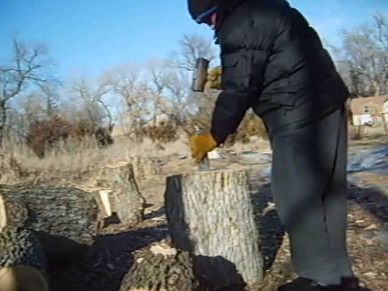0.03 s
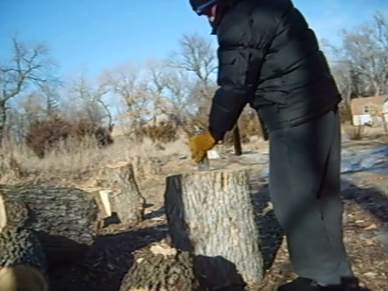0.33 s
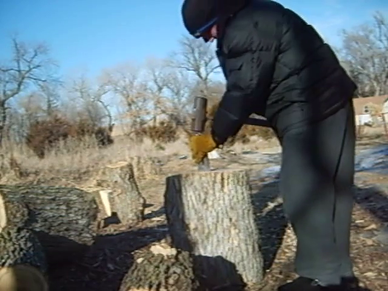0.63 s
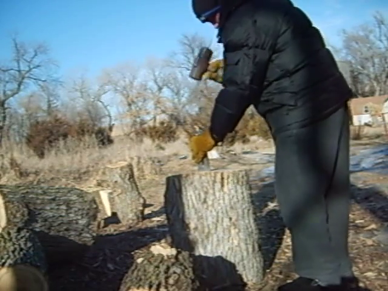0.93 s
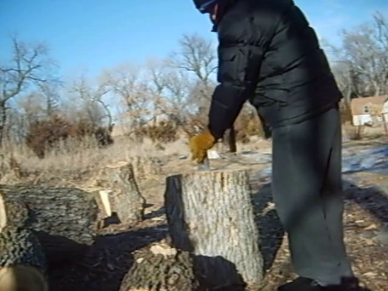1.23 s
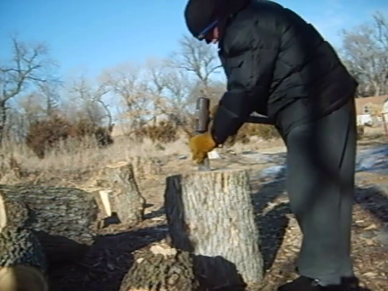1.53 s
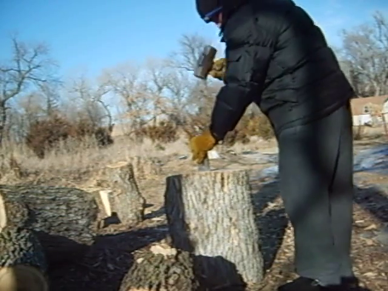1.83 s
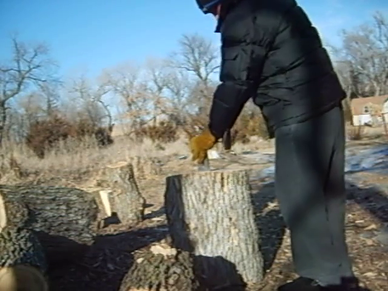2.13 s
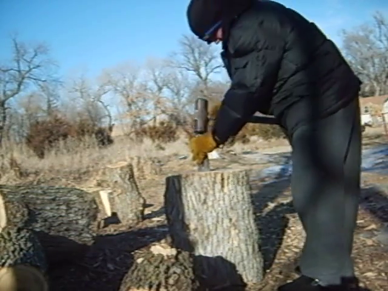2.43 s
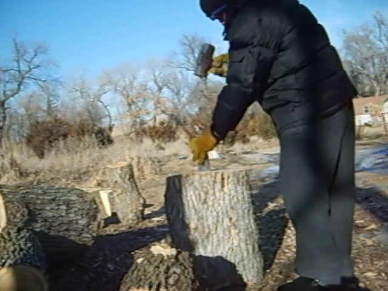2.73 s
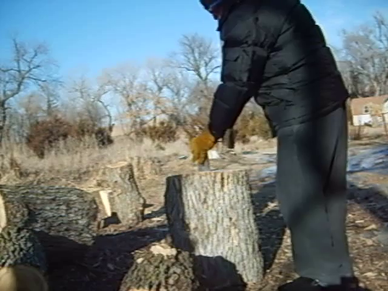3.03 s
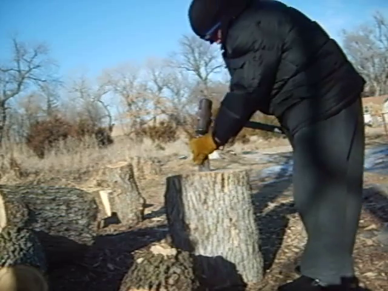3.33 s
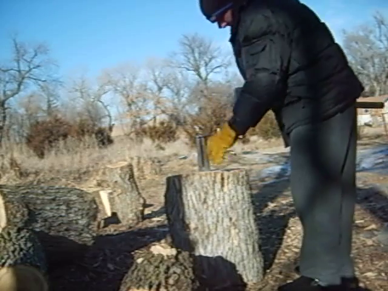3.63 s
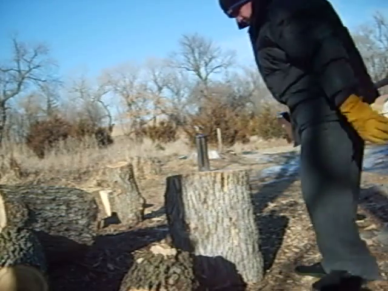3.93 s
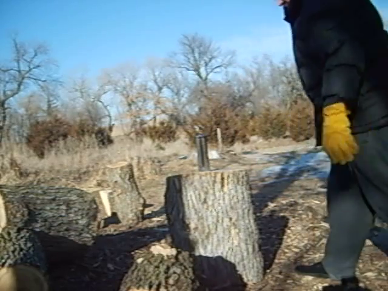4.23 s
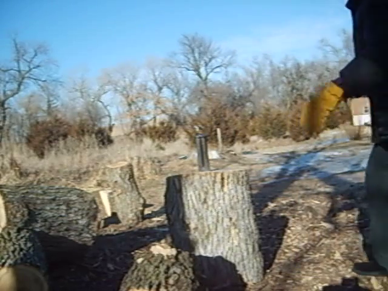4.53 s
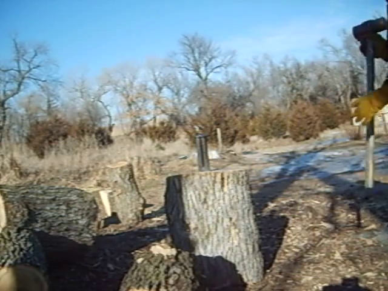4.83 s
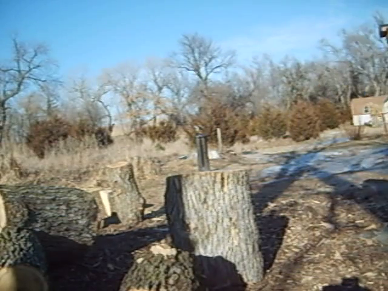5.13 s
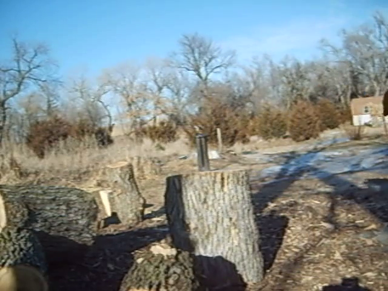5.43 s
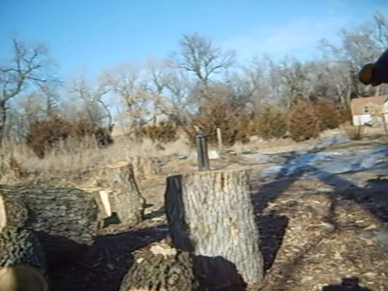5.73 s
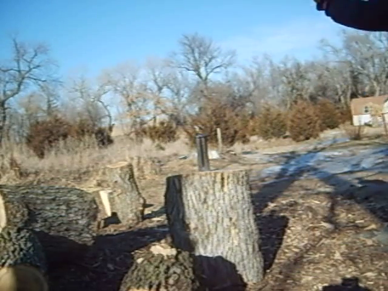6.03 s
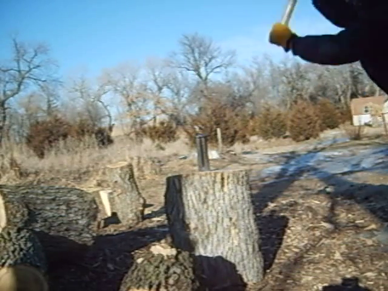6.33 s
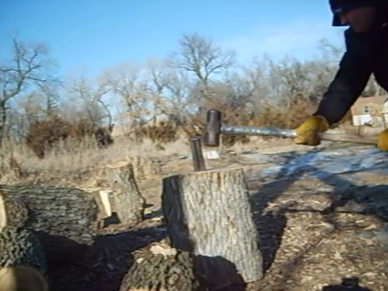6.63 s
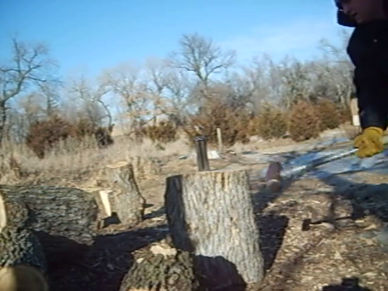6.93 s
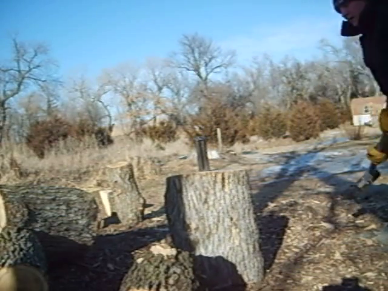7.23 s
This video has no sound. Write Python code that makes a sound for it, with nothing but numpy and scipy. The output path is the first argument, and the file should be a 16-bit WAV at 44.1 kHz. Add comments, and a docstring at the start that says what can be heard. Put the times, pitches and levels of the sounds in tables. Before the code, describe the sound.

Over a very faint outdoor wind rumble, the tail of an earlier clang dies away. A hand hammer then strikes a steel wedge in a log four times, at about 0.6, 1.5, 2.4 and 3.3 seconds. Each blow is a loud, sharp crack with a short metallic clang, a thud of wood and a thin high ring. The hits overload the small microphone, scatter off a nearby woodpile and fade among distant trees. A nylon jacket swishes faintly into every swing. From about 3.9 to 5.6 seconds, quiet footsteps crunch and scuff over dry wood chips, with small twig snaps and jacket rustles. At about 6.6 seconds one heavier sledgehammer blow lands, with a fuller, hollow wooden knock and a bright ring. A soft step follows at 6.8 seconds, and the jacket rustles lightly until the end at around 7.5 seconds.

```python
"""Over a faint rumble of wind, the clang of an earlier blow dies away. A hand hammer sets a steel wedge
in a log with four steady blows, a nylon jacket swishing into every swing. Each clang overloads the
small microphone, scatters off the woodpile and fades among far trees. The worker steps back over
crunching wood chips and snapping twigs, then lands one sledge blow, and the jacket rustles once more."""
import sys
import numpy as np
from scipy import signal
from scipy.fft import rfft, irfft, next_fast_len
from scipy.io import wavfile

SR = 44100
rng = np.random.default_rng(int(sys.argv[2]) if len(sys.argv) > 2 else 0)


def store_wav(level_fs):
    """Save 16-bit WAV to argv[1]."""
    pcm = np.round(np.clip(np.atleast_2d(level_fs), -1, 1) * 32767)
    wavfile.write(sys.argv[1], SR, pcm.T.astype(np.int16))


N = 329427
MIC_EDGE_HZ, OUTPUT_EDGE_HZ = 11200, 17400


def amp(db):
    """Decibels to gain."""
    return 10 ** (np.asarray(db) / 20)


def unit(x):
    """Scales x to rms 1."""
    return x / np.sqrt(np.mean(x ** 2) + 1e-20)


def seconds(length):
    """A time axis of the given length."""
    return np.arange(int(length * SR)) / SR


def decay(t, t60):
    """Falls 60 dB in t60 seconds."""
    return np.exp(-np.log(1000) * t / t60)


def add(mix, start_s, sound):
    """Mixes a sound in at start_s, trimming what falls outside the mix."""
    start = round(start_s * SR)
    sound = sound[max(-start, 0):]
    part = mix[max(start, 0):][:len(sound)]
    part += sound[:len(part)]


def colour(x, spectrum):
    """Shapes x with an EQ curve of (freq_hz, level_db) points, at rms 1."""
    hz, db = np.transpose(spectrum)
    size = next_fast_len(len(x))
    freqs = np.fft.rfftfreq(size, 1 / SR)
    gain = amp(np.interp(np.log(freqs + 1), np.log(hz + 1), db))
    return unit(irfft(rfft(x, size) * gain, size)[:len(x)])


def noise(spectrum, size):
    """Noise through an EQ curve, at rms 1."""
    return colour(rng.standard_normal(size), spectrum)


def drift(per_s, size):
    """Random wander of rms 1, heading for a new value per_s times a second."""
    knots = rng.standard_normal(1024)
    return unit(np.interp(np.arange(size) * per_s / SR, np.arange(1024), knots))


def swells(events):
    """A gain envelope of soft bells, one for each (peak_s, length_s, level_db)."""
    t = np.arange(N) / SR
    return np.sqrt(sum(amp(2 * db) * np.exp(-(2 * (t - s) / length) ** 2) for s, length, db in events))


def lowpass(x, hz):
    """A steep treble cut with no delay."""
    return signal.oaconvolve(x, signal.firwin(161, hz, window=("kaiser", 7), fs=SR), "same")


# EQ of the open-air bed: freq_hz, level_db
AIR_EQ = [(15, -40.5), (25, -6), (59, 0), (96, 1.5), (165, -5.5), (260, -16), (603, -12), (703, -17),
          (884, -13), (979, -18.5), (1590, -18), (3410, -26), (6610, -21.5), (10200, -33.5), (11000, -37),
          (14300, -71), (22000, -120)]
# EQ of the low rumble of wind and ground: freq_hz, level_db
RUMBLE_EQ = [(20, -19), (45, -10.5), (78, -0.5), (130, -3.5), (200, -11), (320, -24.5), (800, -49)]
# Puffs of wind on the microphone: peak_s, length_s, level_db
WIND_PUFFS = [(0.12, 0.09, -60.5), (1.12, 0.13, -59), (1.28, 0.034, -58), (1.87, .2, -58.5)]
def outdoors(air_db=-61, breeze_db=-67.5, lumps_db=1.0):
    """A bed of winter air, with a light, lumpy breeze that puffs at the microphone."""
    wind = noise(RUMBLE_EQ, N) * (amp(breeze_db) + swells(WIND_PUFFS))
    wind *= amp(lumps_db * drift(6.4, N))
    return wind + amp(air_db) * noise(AIR_EQ, N)


# EQ of the hammer's attack: freq_hz, level_db
CRACK_EQ = [(40, -14.5), (300, -8), (900, -4.5), (1700, -3), (2400, -2), (3500, -9.5), (4200, -4),
            (4550, -5.5), (5000, 3.5), (5350, -2), (5720, 2.5), (6500, -3.5), (8500, -10), (11000, -16.5)]
def crack(t, stretch):
    """Steel faces meet: a broadband burst of a few milliseconds with a quiet tail."""
    envelope = np.exp(-(t / (.0026 * stretch)) ** 2) + amp(-17) * decay(t, 0.026 * stretch)
    head = envelope[:2048]
    burst = rng.standard_normal(len(head)) * head
    for _ in range(3):  # iron out chance peaks and notches while keeping the burst tight
        flat = irfft(np.exp(1j * np.angle(rfft(burst))))
        burst = colour(flat, CRACK_EQ) * np.sqrt(head)
    burst = burst * np.linalg.norm(head) / np.linalg.norm(burst)
    return np.pad(burst, (0, len(t) - len(head)))


# Modes of the wedge seated in the wood: pitch_hz, level_db, t60_s
WEDGE_MODES = [(761, -12.5, 0.11), (895, -9.5, .17), (1248, -1.5, 0.061), (1565.6, 4.5, 0.042),
               (1795, -3, 0.069), (2036, -9, 0.15), (2332, -4, 0.066), (2895, -11.5, 0.12),
               (4070, -15.5, 0.19), (4370, -12, 0.057), (4930, -4, 0.039), (5950, -6, 0.049),
               (5770, -16, .16), (7350, -15, 0.12)]
def wedge(t, spread_db=1.5, detune=0.0033):
    """The wedge clangs in its modes; each blow lands a little differently."""
    out = np.zeros(len(t))
    scatter = rng.standard_normal((len(WEDGE_MODES), 3))
    for (hz, db, t60), (strength, shift, phase) in zip(WEDGE_MODES, scatter):
        tone = np.sin(2 * np.pi * (hz * (1 + detune * shift) * t + phase))
        out += amp(db + spread_db * strength) * decay(t, t60) * tone
    return out


def push(t, width_s=0.0017):
    """The blow shoves the top of the log: one short, low pressure pulse."""
    u = t / width_s
    return u * (2 - u) * np.exp(-u)


# Modes of the log under the wedge: pitch_hz, level_db, t60_s
LOG_MODES = [(55, -11, 0.0052), (86, -23.5, 0.013), (127, -24, 0.17), (192, -21, 0.083),
             (284, -15.5, 0.044), (441, -17.5, 0.023)]
def thud(t):
    """The log takes the push and knocks against the ground."""
    return sum(amp(db) * decay(t, t60) * np.sin(2 * np.pi * hz * t) for hz, db, t60 in LOG_MODES)


def shudder(t, t60=0.21, attack_s=0.0054):
    """The ground under the log rumbles briefly."""
    return amp(-38) * noise(RUMBLE_EQ, len(t)) * decay(t, t60) * (1 - np.exp(-t / attack_s))


def thunk(t, hz=660, t60=.08):
    """The wood gives a hollow note as the wedge sinks in."""
    return decay(t, t60) * np.sin(2 * np.pi * hz * t)


def steel_ring(t, hz, pressed_hz=8715, ease_hz_per_s=1800, lift_s=0.033, sag_hz=20, sag_s=.16):
    """A high steel note: sharp under the hammer, then free, sinking and beating, with a late echo."""
    pressed = np.sin(2 * np.pi * np.cumsum(pressed_hz - ease_hz_per_s * t) / SR)
    pressed *= decay(t, 0.41) / (1 + (t / lift_s) ** 6)
    cycles = np.cumsum(hz - sag_hz * (1 - np.exp(-t / sag_s))) / SR
    beat_hz = 8.5 * rng.uniform(.5, 1.4)
    pair = np.sin(2 * np.pi * cycles) + .5 * np.sin(2 * np.pi * (cycles - beat_hz * t + rng.random()))
    free = (1 - np.exp(-t / 0.032)) * decay(t, .25)
    echo = np.exp(-((t - 0.16) / 0.19) ** 2)
    return amp(-21.5) * pressed + pair * (amp(-21.5) * free + amp(-59) * echo)


# EQ of the scatter off the woodpile: freq_hz, level_db
WOODPILE_EQ = [(40, -11), (130, -6.5), (300, -4), (560, -10), (850, -0.5), (1700, -3), (2700, -2),
               (3450, -7), (4200, -4.5), (5600, -4), (7400, -7.5), (8200, -14), (9500, -20), (11000, -30.5)]
# EQ of the slap off broad surfaces: freq_hz, level_db
SLAP_EQ = [(400, -41.5), (1100, -4), (1700, 10), (2300, -2.5), (3500, -6), (9000, -48)]
def woodpile(t, spread_s=0.022, falloff=1.316):
    """Logs nearby throw the blow back in two waves that thin out with distance."""
    first = np.clip((t - .0105) / .0015, 0, 1)
    second = np.clip((t - .0205) / .002, 0, 1)
    paths = (.7 * first + 0.48 * second) * (1 + (t / spread_s) ** 2) ** -falloff
    paths *= amp(2.7 * drift(300, len(t)))
    t_ring = t[:SR // 8]
    clang = wedge(t_ring) * decay(t_ring, 0.26)  # the echoes carry the wedge's modes
    reflections = rng.standard_normal(len(t)) * paths
    ringing = signal.fftconvolve(reflections, clang / np.linalg.norm(clang))[:len(t)]
    scatter = noise(WOODPILE_EQ, len(t)) * paths
    slap = noise(SLAP_EQ, len(t)) * first * np.exp(-((t - .013) / .004) ** 2)
    return amp(-9.5) * scatter + amp(-16) * ringing + amp(-11.5) * slap


# Bands that linger among the far trees: centre_hz, width_hz, level_db
TREE_BANDS = [(1664, 440, -0.5), (2250, 460, -7), (2920, 620, -5), (4070, 340, 2.5), (5000, 300, -8),
              (6100, 500, -8), (7450, 200, -14.5)]
def trees(t, pitch_ratio, t60_low=2.4, t60_high=0.99):
    """Far trunks scatter the clang into a long, fuzzy tail whose high bands die first."""
    out = np.zeros(len(t))
    for hz, width_hz, db in TREE_BANDS:
        pole = np.exp(-np.pi * width_hz / SR)
        white = rng.standard_normal(len(t)) + 1j * rng.standard_normal(len(t))
        wander = signal.lfilter([1], [1, -2 * pole, pole * pole], white)
        band = unit((wander * np.exp(2j * np.pi * hz * pitch_ratio * t)).real)
        out += amp(db) * band * decay(t, np.interp(hz, [1600, 4200], [t60_low, t60_high]))
    return amp(-55) * out * (1 - np.exp(-t / .015)) * amp(1.2 * drift(28, len(t)))


def wall(t, delay_s=0.1387, smear_s=0.0082):
    """A far wall answers the clang with one dull slap."""
    dull = noise([(400, -38), (1100, 4), (1700, 6), (2300, 2), (3500, -9), (9000, -53)], len(t))
    return amp(-32) * dull * np.exp(-((t - delay_s) / smear_s) ** 2)


# The mix of each blow; the first is only a tail, the last is the sledge:
# start_s, crack_db, crack_stretch, clang_db, push_db, thud_db, thunk_db,
# ring_db, ring_hz, woodpile_db, trees_db, trees_pitch_ratio
HAMMER_BLOWS = [(-0.25, 4.5, 1.26, -10.5, -20, -6, -30, -3, 8400, 1.5, -4, 0.91),
                (0.6396, 5, 1.02, -11.5, -14, -5, -29, -8, 8400, -2, -0.5, 0.97),
                (1.5316, 4.5, 1.16, -9.5, -28, -9.5, -32.5, 0, 8380, 0, 1, 1.03),
                (2.4493, 4, 0.95, -8.5, -4, -1.5, -28.5, 1.5, 8402, 0, 0, 0.99),
                (3.3328, 8.5, 1.0, -14, -12.5, -4, -25.5, -2.5, 8440, 0.5, -0.5, .995),
                (6.6095, 2, 1.68, -18.5, -10.5, 2.5, -11.5, 4, 8480, 4, -7.5, 0.93)]
def hammer():
    """Steel on steel: crack and clang on top, the body of the log below, then ring and echoes."""
    out = np.zeros(N)
    t_short, t_mid, t_long = seconds(.25), seconds(.6), seconds(1.4)
    for (start_s, crack_db, stretch, clang_db, push_db, thud_db, thunk_db,
         ring_db, ring_hz, woodpile_db, trees_db, trees_pitch) in HAMMER_BLOWS:
        add(out, start_s, amp(crack_db) * crack(t_short, stretch))
        add(out, start_s, amp(clang_db) * (wedge(t_short) + wall(t_short)))
        add(out, start_s, amp(push_db) * push(t_short))
        add(out, start_s, amp(thud_db) * (thud(t_short) + shudder(t_short)))
        add(out, start_s, amp(thunk_db) * thunk(t_short))
        add(out, start_s, amp(ring_db) * steel_ring(t_mid, ring_hz))
        add(out, start_s, amp(woodpile_db) * woodpile(t_mid))
        add(out, start_s, amp(trees_db) * trees(t_long, trees_pitch))
    return out


# EQ of sliding nylon: freq_hz, level_db
NYLON_EQ = [(120, -35), (200, -4.5), (280, -15), (309, -11), (556, 2), (680, -4), (904, -1.5), (1000, -3.5),
            (6330, -1), (9950, -14.5), (11000, -25.5), (14300, -53), (22000, -120)]
# Rustles as the worker straightens, steps back and handles the sledge: peak_s, length_s, level_db
JACKET_RUSTLES = [(0.03, 0.15, -72), (3.72, 0.32, -64), (4.02, .13, -56), (4.53, .26, -61),
                  (4.78, .26, -63), (5.02, 0.1, -62.5), (5.165, 0.078, -54), (5.25, 0.088, -60),
                  (5.46, .07, -63), (5.76, .16, -60), (5.99, 0.23, -54), (6.88, 0.19, -50),
                  (7.1, 0.26, -55.5), (7.42, 0.25, -59.5)]
# Downswings into the blows: impact_s, length_s, full_speed_db
ARM_SWINGS = [(0.6389, 0.24, -54.5), (1.531, .2, -55.5), (2.4492, 0.19, -53), (3.3335, 0.19, -54),
              (6.6102, 0.33, -48)]
def jacket(flutter_db=1.12, grain_db=2.0, speed_power=1.9, stop_s=.025):
    """Nylon slides on nylon: a grainy hiss that follows the arms as they speed up through each swing."""
    t = np.arange(N) / SR
    level = swells(JACKET_RUSTLES)
    for impact_s, length_s, db in ARM_SWINGS:
        speed = np.clip(1 + (t - impact_s) / length_s, 0, 1)
        speed *= np.exp(-np.maximum(t - impact_s, 0) / stop_s)
        level += amp(db) * speed ** speed_power
    grains = rng.standard_normal(N) * amp(grain_db * rng.exponential(1, N))
    return colour(grains, NYLON_EQ) * level * amp(flutter_db * drift(56, N))


# The clearest snaps of bark and twigs: start_s, peak_db, centre_hz
TWIG_SNAPS = [(0.1246, -51.5, 5500), (1.704, -40, 6200), (1.8974, -44.5, 3750), (1.946, -47, 5470),
              (4.32, -46, 1400), (4.496, -43.5, 1300), (4.6211, -41.5, 2850), (4.892, -42.5, 2840),
              (4.9486, -45, 2150), (5.036, -41.5, 3450), (5.235, -39, 4270), (5.549, -41, 4400)]
def snaps(t60=0.021, walk_s=(4.3, 5.3), flake_count=7, flake_db=-54, flake_hz=4500):
    """Twigs and bark break with short ticks; fainter flakes give way underfoot during the walk."""
    out, t = np.zeros(N), np.arange(SR // 8) / SR
    flakes = [(rng.uniform(*walk_s),
               flake_db + 1.5 * rng.standard_normal(),
               flake_hz * 2 ** rng.uniform(-0.89, 1)) for _ in range(flake_count)]
    for start_s, db, hz in TWIG_SNAPS + flakes:
        tick = noise([(hz / 6, -14), (hz / 2, -4), (hz, 0), (hz * 2, -13), (hz * 4, -24)], len(t))
        tick *= decay(t, t60) + 0.04 * decay(t, .12)
        add(out, start_s, amp(db) * tick / abs(tick).max())
    return out


# Short clicks and clinks just after the blows: start_s, level_db, centre_hz
AFTER_CLICKS = [(0.7018, -13.5, 1440), (1.5436, -12, 4995), (1.587, -15, 1280), (6.6223, -5.5, 6000),
                (6.6306, 0.5, 5500), (6.822, -35, 1300)]
def after_clicks(damped_t60=.2, click_t60=0.0088):
    """Head bounces and one bright early echo, each a click with a damped clink of the wedge."""
    out, t = np.zeros(N), np.arange(SR // 8) / SR
    for start_s, db, hz in AFTER_CLICKS:
        clink = 0.35 * wedge(t) * decay(t, damped_t60)
        click = amp(-2) * rng.standard_normal(len(t)) * decay(t, click_t60)
        band = signal.butter(1, [hz / 1.6, min(hz * 1.5, MIC_EDGE_HZ)], "bandpass", fs=SR)
        add(out, start_s, amp(db) * signal.lfilter(*band, clink + click))
    return out


# EQ of crunching wood chips: freq_hz, level_db
CHIPS_EQ = [(100, -4), (350, 4), (650, 9.5), (1200, 0), (2500, 1), (5000, -11), (8000, -7.5), (11000, -46)]
# Shoes on the chips: start_s, crunch_db, length_s, scuff_db
SHOE_STEPS = [(3.941, -57, 0.11, -67), (4.31, -56, 0.051, -59.5), (4.437, -59, 0.063, -80),
              (4.621, -71, 0.11, -65.5), (4.889, -52.5, 0.038, -58), (4.946, -61, 0.028, -66.5),
              (5.034, -61, 0.026, -72.5), (5.229, -57.5, 0.069, -75), (5.482, -62.5, 0.058, -53.5),
              (5.544, -68, 0.077, -48.5), (6.801, -45.5, 0.053, -50)]
def footsteps(cracks_per_s=900, spread_db=1.5, scrape_db=2.0, attack_s=0.0047):
    """Each shoe crushes a clump of dry chips and scuffs over them."""
    out, t = np.zeros(N), np.arange(SR // 3) / SR
    attack = 1 - np.exp(-t / attack_s)
    for start_s, crunch_db, length_s, scuff_db in SHOE_STEPS:
        breaks = rng.random(len(t)) < cracks_per_s / SR
        cracks = breaks * amp(spread_db * np.minimum(rng.exponential(1, len(t)), 4))
        grains = (cracks + 0.039) * rng.standard_normal(len(t))
        crunch = colour(grains, CHIPS_EQ) / (1 + (t / length_s) ** 4)
        scuff = noise([(500, -6), (1500, -3.5), (3500, 2), (6000, 1.5), (8000, -4), (11000, -24)], len(t))
        scuff *= amp(scrape_db * drift(169, len(t))) / (1 + (t / length_s) ** 12)
        add(out, start_s, (amp(crunch_db) * crunch + amp(scuff_db) * scuff) * attack)
    return out


def scene():
    """The blows, the worker's movements and the open air, in mono."""
    return (hammer() + after_clicks() + jacket() + footsteps() + snaps() + outdoors())[None]


def record(dry):
    """Each crack overloads the microphone; its narrow band overshoots, clips again and is filtered."""
    overloaded = np.clip(dry[0], -1.05, 1.05)
    narrow = lowpass(overloaded, MIC_EDGE_HZ)
    return lowpass(np.clip(narrow, -1, 1), OUTPUT_EDGE_HZ)[None]


dry = scene()
out = record(dry)
store_wav(out)
```